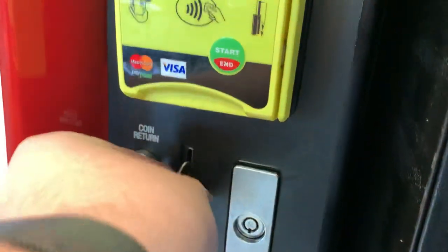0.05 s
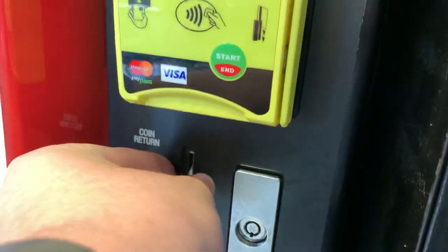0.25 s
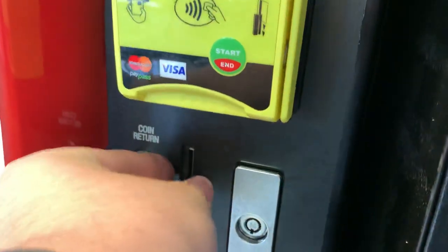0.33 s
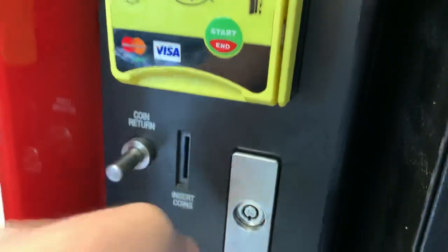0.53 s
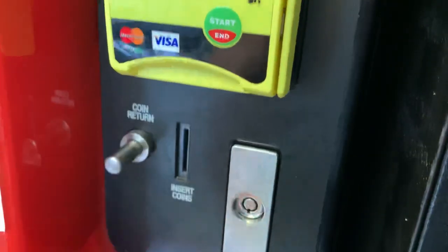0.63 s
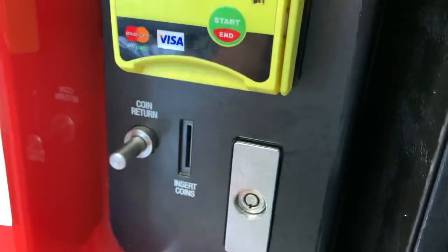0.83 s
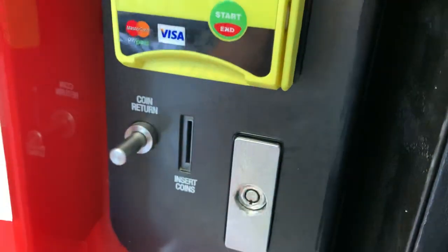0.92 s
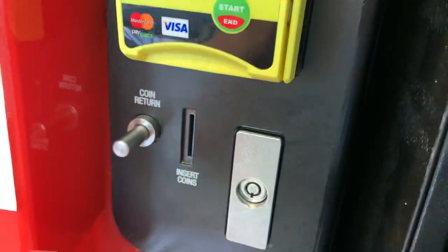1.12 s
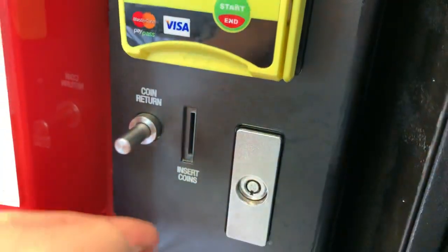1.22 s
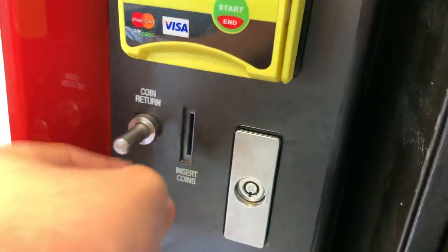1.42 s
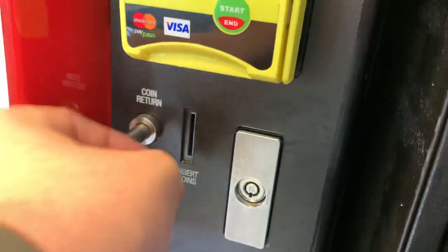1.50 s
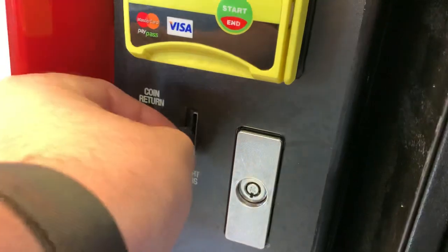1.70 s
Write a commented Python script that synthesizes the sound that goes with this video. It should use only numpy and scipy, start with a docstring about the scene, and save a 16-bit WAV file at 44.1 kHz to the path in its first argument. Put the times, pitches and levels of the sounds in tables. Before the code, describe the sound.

Close up, a coin goes into a vending machine with a sharp click, clinks and rolls through the mechanism, then lands with quieter clicks and dull taps. The machine hums softly throughout, joined by a thin whirr.

```python
"""A coin in a vending machine

A coin, heard close by, snaps through the slot, rattles down the chute and drops into the box. Each
impact excites the damped modes of the parts it meets; rolling is a train of tiny impacts, and where
the coin is free it rings thinly in its own modes. The compressor hums and air moves throughout;
two faint tones pass, and a thin whirr joins in once the coin is inside."""
import sys
import numpy as np
from scipy import signal
from scipy.fft import rfft, irfft
from scipy.io import wavfile
from scipy.ndimage import uniform_filter1d, map_coordinates

SR = 44100
rng = np.random.default_rng(int(sys.argv[2]) if len(sys.argv) > 2 else 0)


def transcribe(u):
    """Save the signal u as a 16-bit wav file named by the first command-line argument.

    u: samples, shape (n,) or (channels, n), limited to [-1, 1]; the rate is SR.
    q: integer samples, one column per channel.
    """
    v = np.clip(np.atleast_2d(u).T, -1, 1)
    q = np.round(v * 32767).astype(np.int16)
    wavfile.write(sys.argv[1], SR, q)


N = 77175

# Modes of the small parts, the chute and the front panel: (frequency [Hz], level [dB], T60 [s])
TICK_MODES = [(6040, -7.5, 0.02), (6350, -14, 0.012), (6842, -0.5, 0.022), (7535, -0.5, 0.018),
              (7960, -2.5, 0.0053), (9000, -2.5, 0.018), (9880, 0.5, 0.0092), (10350, -2.5, .011),
              (10990, 1.5, 0.012), (11600, -3, 0.013), (12350, 2, .018), (12850, -13.5, 0.011),
              (13360, -0.5, 0.024), (15000, -6, 0.0049), (15300, -3.5, .009)]
CHUTE_MODES = [(3520, -17, 0.011), (3870, -12, 0.021), (4300, -15.5, 0.011), (4827, -10, 0.018),
               (5300, -12.5, 0.016)]
PANEL_MODES = [(1638, -7.5, 0.03), (1978, -1, 0.031), (2174, -7, 0.022), (2485, -2.5, 0.041),
               (2836, 0, 0.02)]
# The slot's own mode rings less as the coin gets deeper
SLOT_HZ, SLOT_DB, SLOT_T60, SLOT_FADE_DB_PER_S = 3280, -7, 0.026, 19.5


def amp(db):
    """Amplitude ratio of a level in decibels."""
    return 10 ** (np.asarray(db) / 20)


def unit(x):
    """Normalisation to an rms of 1."""
    return x / np.sqrt(np.mean(abs(x) ** 2) + 1e-20)


def seconds(size):
    """Time axis of size samples."""
    return np.arange(size) / SR


def bins():
    """Frequency axis of a full-length spectrum."""
    return np.fft.rfftfreq(N, 1 / SR)


def curve(points):
    """Interpolation of (frequency, value) points over the spectrum, in log frequency."""
    hz, value = np.transpose(points)
    return np.interp(np.log(bins() + 1), np.log(hz + 1), value)


def add(mix, start, sound):
    """Superposition of a sound on the mix, from a start time in seconds."""
    part = mix[max(round(start * SR), 0):][:len(sound)]
    part += sound[:len(part)]


def noise(response):
    """Spectral shaping of white noise, to an rms of 1."""
    return unit(irfft(rfft(rng.standard_normal(N)) * response, N))


def drift(rate_hz):
    """Slow random fluctuation: low-passed noise with an rms of 1."""
    return noise(np.exp(-(bins() / rate_hz) ** 2))


def air():
    """Broadband noise of moving air and the compressor, fluctuating slightly in level."""
    # Noise spectrum: (frequency [Hz], relative spectral density [dB])
    spectrum = [(20, -13), (40, -10), (60, -3.5), (120, -2), (190, -0.5), (280, -0.5), (440, -6.5),
                (600, -10.5), (800, -15), (1100, -21), (1600, -25.5), (2400, -32.5), (3500, -39),
                (5000, -31), (7000, -43.5), (9000, -36), (12000, -49.5), (16000, -54)]
    return noise(amp(curve(spectrum))) * amp(-38.5 + 1.5 * drift(rate_hz=32))


def compressor_hum(depth=0.59, waver_hz=6.3):
    """Low partials of the compressor waver by random amplitude and phase modulation."""
    # Partials: (frequency [Hz], level [dB])
    partials = [(59, -57.5), (115, -44.5), (131, -43.5), (277, -48.5), (410, -48)]
    t, out = seconds(N), np.zeros(N)
    for hz, db in partials:
        envelope = 1 + depth * drift(waver_hz)
        phase = 2 * np.pi * (hz * t + rng.random()) + depth * drift(waver_hz)
        out += amp(db) * unit(envelope * np.sin(phase))
    return out


def whirr(start_s=0.49, rise_s=0.21, waver_hz=15.5, waver_db=4, pitch_depth=0.008):
    """Noise-driven resonances fade in, wavering separately in level and together in pitch."""
    # Resonances: (centre frequency [Hz], bandwidth [Hz], level [dB])
    resonances = [(919, 28, -56), (1082, 16, -67.5), (1289, 23, -61.5), (1338, 8, -66), (1585, 56, -57),
                  (1774, 38, -63), (1780, 55, -67), (2670, 970, -66), (5000, 2600, -70)]
    sound = np.zeros(N)
    for hz, width, db in resonances:
        band = noise(1 / (1 + (2 * (bins() - hz) / width) ** 2))
        sound += amp(db) * unit(band * amp(waver_db * drift(waver_hz)))
    warped_time = np.cumsum(1 + pitch_depth * drift(waver_hz))
    fade_in = np.clip((seconds(N) - start_s) / rise_s, 0, 1)
    return map_coordinates(sound, [warped_time], order=3, mode="mirror") * fade_in


def machine():
    """Superposition of the running machine's air noise, hum and whirr."""
    # Gain of air and hum: (time [s], level [dB])
    swell = [(0, -3), (.3, -1), (1.75, -1.5)]
    gain = amp(np.interp(seconds(N), *np.transpose(swell)))
    return (air() + compressor_hum()) * gain + whirr()


def faint_tones(sag=0.103, deviation_hz=12.4):
    """Frequency-modulated tones swell and fade, a little flat at both ends."""
    # Tones: (start [s], duration [s], top frequency [Hz], level [dB])
    tones = [(.29, .23, 729, -47.5), (.32, 0.163, 903, -50.5)]
    out = np.zeros(N)
    for start, length, top_hz, db in tones:
        edge = np.linspace(-1, 1, round(length * SR)) ** 2
        hz = top_hz * (1 - sag * edge) + deviation_hz * drift(rate_hz=68)[:len(edge)]
        add(out, start, amp(db) * np.sqrt(1 - edge) * np.sin(2 * np.pi * np.cumsum(hz) / SR))
    return out


def modal_response(modes, spread_db=2):
    """Free decay of modes, varied at random; the more damped a mode, the more its pitch strays."""
    t, out = seconds(3000), np.zeros(3000)
    for k, (hz, db, t60) in enumerate(modes):
        level_offset, detune = rng.uniform(-1.1, 1, 2)
        decay = amp(db + spread_db * level_offset - 60 * t / t60)
        out += (-1) ** k * decay * np.sin(2 * np.pi * (hz + detune / t60) * t)
    return out


def reflections(envelope):
    """Dense echoes under an envelope, whitened to feed all frequencies about equally."""
    spectrum = rfft(envelope * rng.choice([-1., 1.], len(envelope)))
    power = abs(uniform_filter1d(abs(spectrum) ** 2, size=70))
    return irfft(spectrum / np.sqrt(power + 1e-12), len(envelope))


def strike(modes, gain_db, early_t60, tail_db, tail_t60):
    """Forced response of modes to a short contact and its dense reflections in the cabinet."""
    contact_db, contact_s, rise_s, attack_s = 5, 0.00086, 0.00072, 0.0056
    t = seconds(14000)
    contact = amp(contact_db) * np.exp(-t / contact_s)
    echoes = amp(-60 * t / early_t60) + amp(tail_db - 60 * t / tail_t60)
    drive = (contact + echoes) * (1 - np.exp(-t / rise_s))
    body = modal_response(modes)
    sound = signal.fftconvolve(reflections(drive) * np.linalg.norm(drive), body)[:len(t)]
    # Hold the short-term power to its expected value, so that the decay is even
    power = abs(signal.fftconvolve(drive ** 2, body ** 2)[:len(t)])
    expected = abs(uniform_filter1d(power, size=500))
    actual = abs(uniform_filter1d(sound ** 2, size=500))
    sound *= np.sqrt(expected / (actual + 1e-9))
    attack_rms = np.sqrt(np.mean(sound[:round(attack_s * SR)] ** 2))
    return amp(gain_db) * sound / attack_rms


def rolling(contacts_per_s=600, spread_db=4.5, spots=5, panel_db=-7, slot_db=-4.5):
    """Random impulse trains excite modes at several spots as the coin chatters down a ramp."""
    # Rolls: (start [s], duration [s], tick level [dB], chute and panel level [dB])
    rolls = [(0.333, 0.08, -31.5, -38.5), (0.402, 0.088, -42, -44.5), (0.697, 0.071, -38, -42.5),
             (1.236, 0.13, -48, -46), (1.522, 0.047, -56, -55), (1.55, 0.043, -59, -70)]
    t, out = seconds(N), np.zeros(N)
    arches = [np.sqrt(np.clip(1 - (2 * (t - start) / length - 1) ** 2, 0, 1))
              for start, length, _, _ in rolls]
    bright, dull = amp(np.array(rolls)[:, 2:]).T @ np.array(arches)
    near_slot = dull * amp(slot_db - SLOT_FADE_DB_PER_S * (t - rolls[0][0]))
    for _ in range(spots):
        force = rng.standard_normal(N) * amp(spread_db * rng.standard_normal(N))
        clicks = unit(force * (rng.random(N) < contacts_per_s / spots / SR))
        chute = unit(modal_response(CHUTE_MODES)) + amp(panel_db) * unit(modal_response(PANEL_MODES))
        ticks = modal_response(TICK_MODES)
        slot = modal_response([(SLOT_HZ, SLOT_DB, SLOT_T60)])
        for envelope, body in ((bright, ticks), (dull, chute), (near_slot, slot)):
            out += signal.oaconvolve(clicks * envelope, body / np.linalg.norm(body))[:N]
    return out / np.sqrt(spots)


def coin_ring(rise_s=0.0025, shimmer_hz=90.5, shimmer_db=2):
    """Free vibration of the coin: high modes that shimmer by phase and amplitude modulation."""
    # Spells of free ringing: (time [s], level [dB], T60 [s])
    rings = [(.232, -33, 0.078), (.329, -26, 0.054), (0.341, -28.5, 0.12), (0.4277, -37, 0.17),
             (0.581, -29, 0.16), (0.601, -30, 0.078), (.6386, -32, 0.15), (.6945, -25.5, 0.17),
             (.7215, -42, 0.11), (.743, -44, 0.11), (1.1413, -44, 0.11), (1.1991, -51, 0.1),
             (1.4632, -37, 0.37), (1.531, -42, .15), (1.566, -46, 0.12), (1.595, -46, 0.09)]
    # Modes of the coin: (frequency [Hz], level [dB])
    modes = [(15255, 0), (15200, -9), (9300, -23), (7070, -26)]
    t, out = seconds(18000), np.zeros(N)
    for start, db, t60 in rings:
        tone = np.zeros(len(t))
        for hz, mode_db in modes:
            phase = 2 * np.pi * (hz * t + rng.random()) + drift(shimmer_hz)[:len(t)]
            tone += amp(mode_db) * np.sin(phase)
        envelope = amp(db - 60 * t / t60) * (1 - np.exp(-t / rise_s))
        add(out, start, unit(tone) * envelope)
    return out * amp(shimmer_db * drift(shimmer_hz))


def box_knocks():
    """Low modes knock dully as the coin meets the housing and lands in the box."""
    # Knocks: (time [s], level [dB])
    knocks = [(.58, -42), (0.6028, -40.5), (1.141, -44.5), (1.2655, -42), (1.2957, -38), (1.315, -44),
              (1.3343, -44), (1.35, -45.5), (1.4634, -44), (1.6601, -44), (1.675, -43.5)]
    # Modes of the box: (frequency [Hz], level [dB], T60 [s])
    modes = [(430, -3, 0.062), (558, -3, .044), (738, -8.5, 0.04), (960, -8, 0.042), (1150, -6, 0.037),
             (1396, -11, 0.031)]
    out = np.zeros(N)
    for start, db in knocks:
        knock = strike(modes, gain_db=-1, early_t60=0.0653, tail_db=-13, tail_t60=0.5)
        add(out, start, amp(db) * knock)
    return out


def chute_impacts(part_t60=0.023, radiation_hz=1530):
    """Impact excitation: each blow of the coin rings small parts, the part it meets and the panel."""
    # Blows: (time [s], tick level [dB], part level [dB], panel level [dB], part frequency [Hz])
    blows = [(0.2308, -13, -13.5, -16, 3271), (0.2326, -20, -10, -25, 4610), (0.2467, -29, -30, -23, 4880),
             (0.3112, -35, -23, -41, 3270), (0.328, -18.5, -20.5, -33, 3320),
             (0.342, -19, -21, -30.5, 3270), (0.347, -37, -43, -35, 3260), (0.365, -24, -33, -46, 4640),
             (0.373, -18.5, -41, -36, 4830), (0.381, -31, -43, -34, 4600), (0.389, -37, -38, -40, 4660),
             (0.416, -33, -35.5, -35, 4600), (0.4282, -27.5, -28.5, -36.5, 3250),
             (0.434, -30, -39, -39, 3140), (0.449, -43, -42, -39, 3260), (0.456, -41, -31.5, -43, 3270),
             (0.465, -36, -41, -37, 4740), (0.505, -40, -47, -45, 3500), (0.516, -45, -52, -46, 4700),
             (0.5795, -14, -21, -24, 3185), (0.6012, -21, -21.5, -23, 3980), (0.611, -51, -31, -25, 4005),
             (0.6383, -22, -22.5, -34, 4070), (0.681, -40, -38, -40, 4260),
             (0.6939, -20.5, -21.5, -33, 4560), (0.705, -24, -31, -45, 4700),
             (0.716, -24.5, -31, -43, 4620), (0.723, -24.5, -28.5, -35, 4370),
             (0.733, -37, -27.5, -44, 4520), (0.743, -32, -28.5, -49, 4500), (0.753, -31.5, -29, -54, 4410),
             (0.765, -49, -43, -54, 4500), (0.8092, -71, -39, -57, 4690), (0.8243, -34, -31, -41, 4490),
             (1.1398, -29, -31.5, -38, 4380), (1.1428, -40, -25.5, -52, 6840),
             (1.1757, -28, -33.5, -47, 4270), (1.1892, -36, -36, -55, 4750),
             (1.1986, -19, -23.5, -38, 4220), (1.207, -53, -35, -45, 3430), (1.2645, -30, -27, -31.5, 4280),
             (1.276, -34.5, -35.5, -37.5, 4430), (1.2947, -31.5, -37, -38, 3380),
             (1.315, -45, -38.5, -36, 3370), (1.334, -39, -38, -51, 3410), (1.351, -42, -42, -42, 3610),
             (1.4632, -33, -38, -46, 3200), (1.531, -44, -49.5, -52, 3830), (1.565, -58, -62, -44, 4480),
             (1.594, -48, -59, -58, 3100), (1.658, -33, -31.5, -36.5, 4370), (1.661, -32, -37, -41, 3430),
             (1.674, -35.5, -40, -50, 3460)]
    out = np.zeros(N)
    for start, tick_db, part_db, panel_db, part_hz in blows:
        slot_db = SLOT_DB - SLOT_FADE_DB_PER_S * (start - blows[0][0])
        part_modes = [(part_hz, 0, part_t60), (SLOT_HZ, slot_db, SLOT_T60), *CHUTE_MODES]
        tick = strike(TICK_MODES, gain_db=-5, early_t60=0.033, tail_db=-29, tail_t60=0.6)
        part = strike(part_modes, gain_db=-5, early_t60=0.0218, tail_db=-23, tail_t60=0.27)
        panel = strike(PANEL_MODES, gain_db=-7, early_t60=0.0046, tail_db=-12, tail_t60=0.18)
        add(out, start, amp(tick_db) * tick + amp(part_db) * part + amp(panel_db) * panel)
    # Small parts radiate little at low frequencies
    return signal.sosfilt(signal.butter(3, radiation_hz, "high", fs=SR, output="sos"), out)


def room(x, level_db=-9, t60=0.066):
    """Reverberation: short, exponentially decaying reflections, different at each microphone."""
    t = seconds(8000)
    tail = rng.standard_normal((2, len(t))) * amp(-60 * t / t60)
    return amp(level_db) * signal.fftconvolve(x[None], tail / np.linalg.norm(tail[0]), axes=1)[:, :N]


def microphones(x):
    """Phase and level differences between two microphones on a small body, at constant total power."""
    # Lead of the left microphone: (frequency [Hz], phase [rad])
    lead = [(20, 0), (300, .1), (600, .5), (1030, 1.2), (1550, -1.6), (2000, .2), (2300, 1.2), (2750, 3.2),
            (3000, 2.7), (3300, -.2), (4600, 1.2), (5100, 2.7), (5700, 2.9), (6300, 6), (7600, 4.5),
            (8500, 3.14), (9400, 2.3), (10400, .4), (11500, -.5), (13300, -3.14), (15300, -6.1),
            (16500, -6.3)]
    # Left relative to right: (frequency [Hz], level [dB])
    balance = [(100, 0), (1200, 0), (2100, 1), (3300, -4.5), (4600, -5.5), (5800, -7.5), (7000, 1),
               (16000, -0.5)]
    half_db = curve(balance) / 2
    pair = np.array([np.exp(1j * curve(lead)) * amp(half_db), amp(-half_db)])
    return irfft(rfft(x) * pair / np.sqrt(np.mean(abs(pair) ** 2, axis=0)), N)


def scene():
    """Superposition of direct sound, the coin's reverberation and the machine's diffuse field."""
    # Diffuse relative to direct machine noise: (frequency [Hz], level [dB])
    diffuse_gain = [(30, -6), (100, -12), (300, -29), (1000, -3), (3000, 8), (9000, -12), (16000, -12)]
    clinks = chute_impacts() + box_knocks() + rolling() + coin_ring()
    uncorrelated = np.array([machine(), machine()])
    diffuse = irfft(rfft(uncorrelated) * amp(curve(diffuse_gain)), N)
    return microphones(clinks + machine() + faint_tones()) + room(clinks) + diffuse


def record(dry, cutoff_hz=16100):
    """Band limiting by a linear-phase low-pass filter."""
    lowpass = signal.firwin(151, cutoff_hz, window=("kaiser", 9), fs=SR)
    return signal.oaconvolve(dry, lowpass[None], "same")


dry = scene()
out = record(dry)
transcribe(out)
```